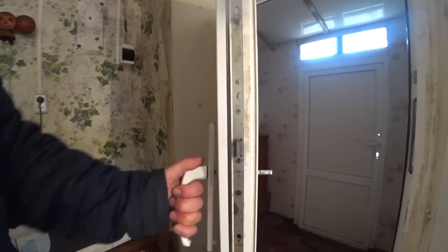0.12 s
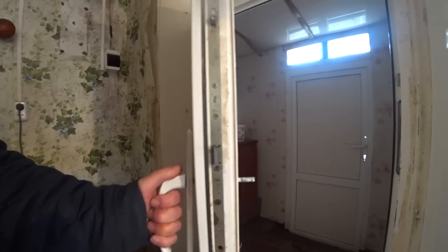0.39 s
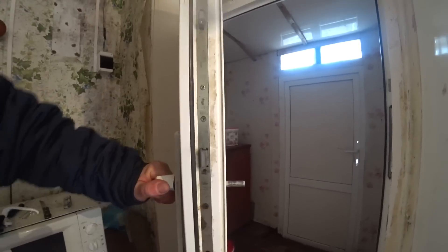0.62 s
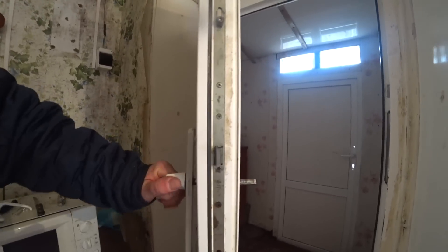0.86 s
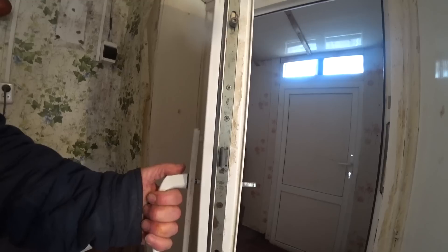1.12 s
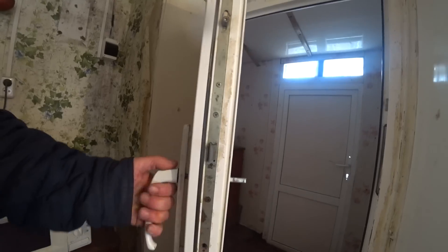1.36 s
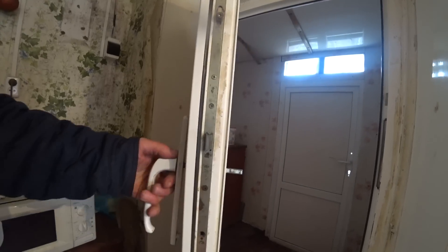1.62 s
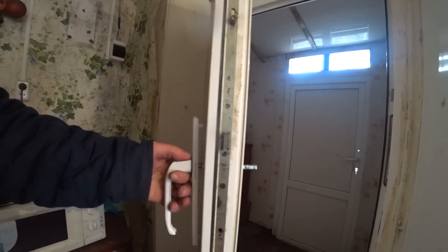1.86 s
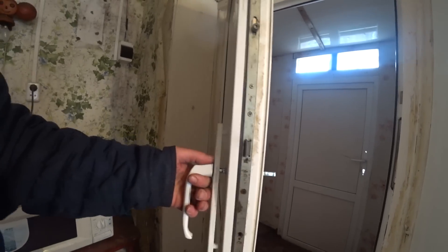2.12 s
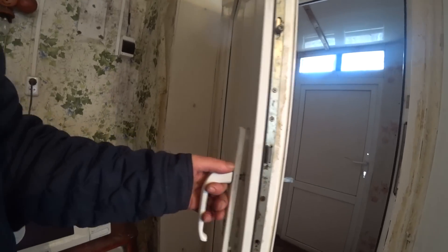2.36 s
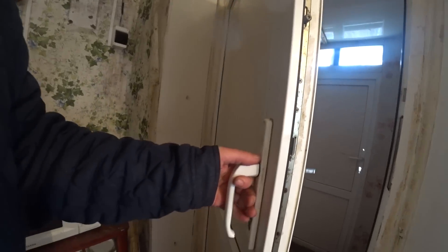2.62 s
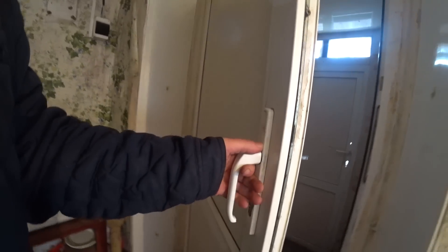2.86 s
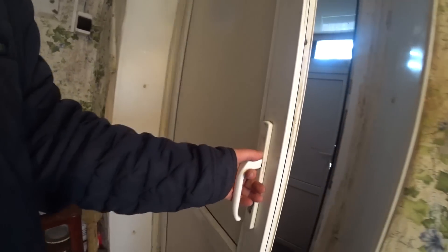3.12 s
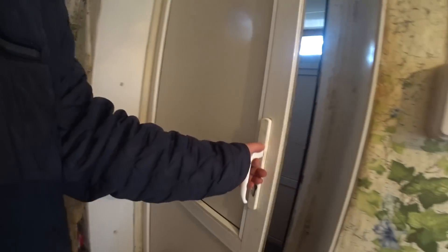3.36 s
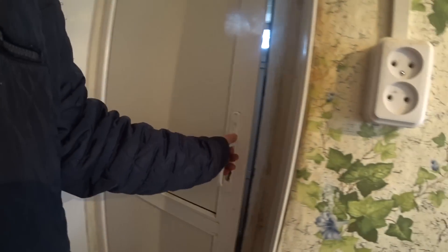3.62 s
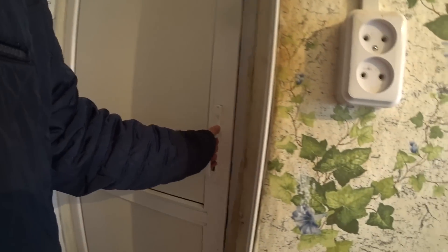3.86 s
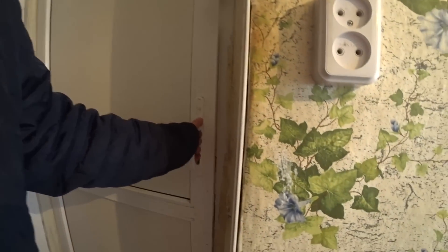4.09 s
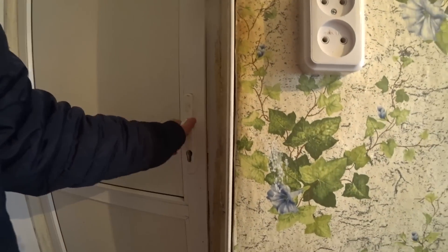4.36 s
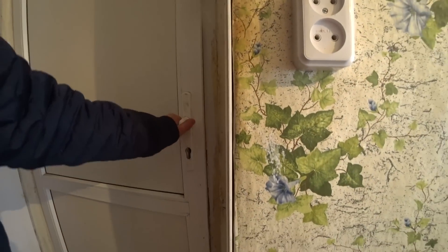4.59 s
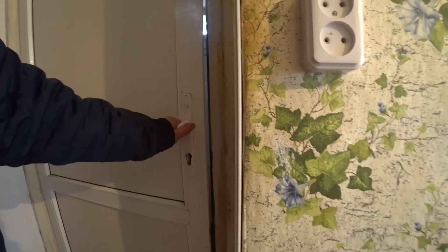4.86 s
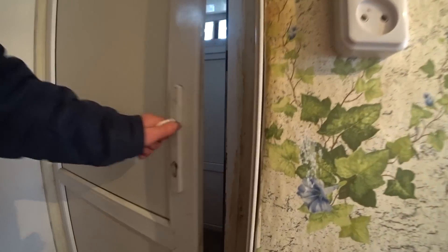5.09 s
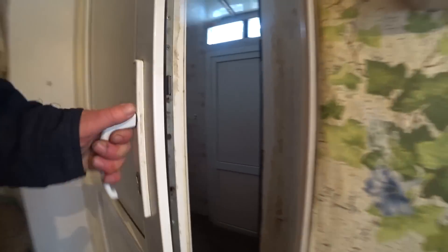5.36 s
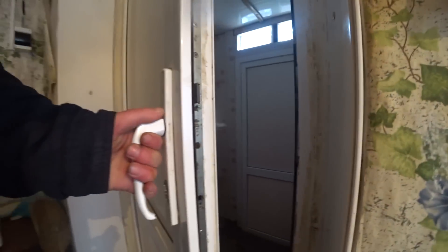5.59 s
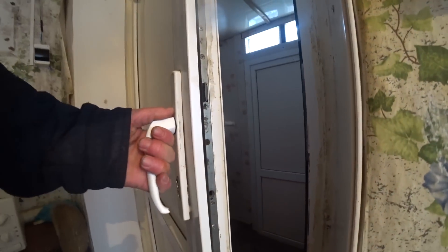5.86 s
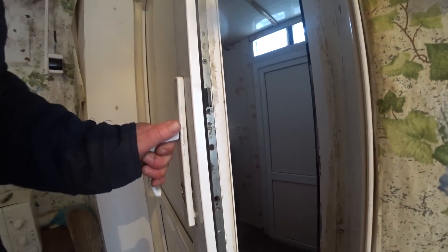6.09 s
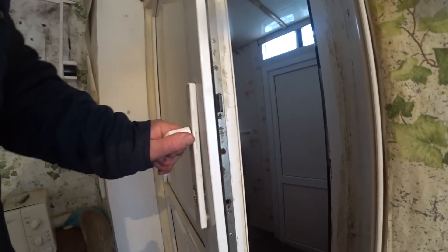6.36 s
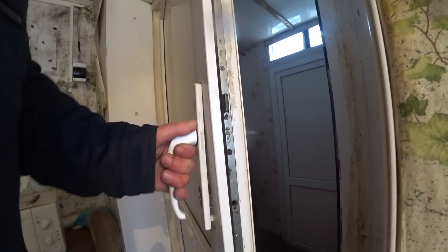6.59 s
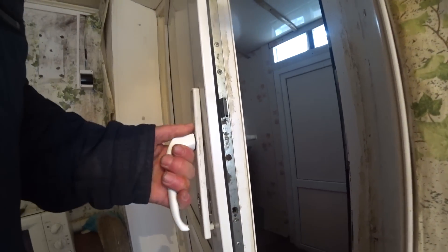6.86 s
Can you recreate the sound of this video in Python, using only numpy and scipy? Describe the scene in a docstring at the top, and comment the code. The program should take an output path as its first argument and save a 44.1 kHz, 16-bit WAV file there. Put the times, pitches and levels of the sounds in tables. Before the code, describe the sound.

In a small bare room, close to the microphone, a hand works the handle of a plastic door. From 0 to 0.25 s a rapid flurry of hard lock clicks peaks near 0.14 s; more clacks come around 0.5-0.65 s and a strong, scraping clatter at 1.0-1.1 s. From 1.3 to 2.8 s clicks become lighter and duller, with small rattles and soft sleeve rustle. Around 2.9-3.9 s the door swings almost quietly, with a few faint ticks and a rising brush. At 3.93 s it shuts with a loud, sharp clack and brief rattling, followed by smaller clicks, one firmer at 4.35 s. After a quiet reopening, clicks return at 5.4 and 5.7 s, a loud snap at 6.1 s, and a double-struck clatter around 6.7 s. Short wall echoes follow each blow; faint steady hiss with thin, wavering high tones continues throughout.

```python
"""The lock of a plastic door clicks and clatters as a hand works its handle: short contacts excite damped modes
of lock case, small steel parts and door leaf. The door is shut and opened again. A small bare room answers each
blow with wall echoes, a dense tail and its lowest modes. Sleeve and door rustle as filtered noise of moving
level and tilt, over a faint steady hiss with thin wavering tones."""
import sys
import numpy as np
from scipy import signal
from scipy.fft import rfft, irfft, next_fast_len
from scipy.io import wavfile
from scipy.ndimage import uniform_filter1d

SR = 44100
rng = np.random.default_rng(int(sys.argv[2]) if len(sys.argv) > 2 else 0)


def wrap_up_sound(samples):
    """Save the sound to the file named by the first command line argument, as 16-bit audio."""
    columns = np.atleast_2d(samples).T
    # keep every value between -1 and 1, then stretch to whole-number steps
    tamed = np.clip(columns, -1, 1)
    steps = np.round(tamed * 32767).astype(np.int16)
    wavfile.write(sys.argv[1], SR, steps)


def volts_from_decibels(level):
    """Turn decibel levels (scalar or array-like) into linear amplitude factors."""
    exponent = np.asarray(level, float) / 20
    return 10 ** exponent


N = 307377  # samples, about 7 s

# Modes of the door leaf, the small steel parts and the lock case:
# (frequency [Hz], relative level [dB], decay time t60 [s])
LEAF_MODES = [(157, -17.5, 0.059), (227.4, -6, 0.064), (282.6, 0, 0.028), (314.4, 9, 0.026),
              (390.4, 3, 0.043), (413.4, 8, 0.031), (518, -45, 0.085), (599, 3.5, 0.047),
              (720, -19.5, 0.004), (949, 16.5, 0.013)]
STEEL_MODES = [(6620, -8, .012), (7190, -8, .012), (8040, -8, .012), (9210, -5, .025), (10400, -9, .012),
               (11400, -7, .03), (13600, -10, .015)]
CASE_MODES = [(750, -18, 0.0038), (1050, -2.5, 0.011), (1300, -0.5, 0.0024), (1650, -0.5, 0.007),
              (1950, 1, 0.0032), (2295, 0.5, 0.0031), (2342, -13.5, 0.0081), (2898, 9, 0.0026),
              (2830, -21.5, 0.002), (3464, 8.5, 0.0021)]
# Clicks of latch, rods and handle stops:
# (time [s], strength [dB], centre of the crack [Hz], knock of the leaf [dB], steel tick [dB])
CLICKS = [(0.0105, -27, 2200, -11.5, -13), (0.0745, -30, 1750, -5, -19), (0.0864, -12.5, 2200, -40, -14),
          (0.096, -11.5, 2250, -28, -17), (0.105, -7.5, 2040, -13.5, -16), (0.1222, -10, 1790, -24, -11),
          (0.1393, 8, 2760, -23.5, -10.5), (0.1621, -0.5, 2250, -14.5, -6.5), (0.182, -6, 2620, -18, -14),
          (0.1957, -9, 2630, -42, -6), (0.213, -2, 2650, -22.5, -8.5), (0.227, -10.5, 3020, -15, -22),
          (0.2436, -21, 1980, -10, -2), (0.3946, -29, 2500, -11, -12), (0.4084, -16.5, 1850, -16, -15.5),
          (0.4552, -12.5, 1050, -32, -8), (0.4615, -6.5, 2300, -40, -13.5), (0.5004, -19, 2500, -23, -14),
          (0.5377, -17, 2110, -9, -15), (0.5905, -2, 2060, -14.5, -14.5), (0.6356, -2.5, 2230, -13, -8),
          (0.6694, -28, 1540, -9, -31), (0.7323, -15, 2000, -30, -26), (0.7625, -24, 1810, -21, -28),
          (0.8157, -35, 1900, -12.5, -22), (0.8852, -22, 2880, -34, -23), (0.918, -18, 1764, -37, -15),
          (0.997, -23, 1650, -11, -8), (1.0085, -8.5, 2500, -39, -11), (1.0591, 4.5, 1860, -40, -6),
          (1.0876, -7.5, 1950, -13, -9), (1.1133, -14.5, 2280, -14, -11), (1.1264, -10, 2920, -16.5, -12),
          (1.299, -32.5, 2450, -32, -9), (1.3203, -18.5, 1800, -14.5, -30), (1.363, -21, 2220, -14, -16),
          (1.3713, -13, 1740, -31, -19), (1.3959, -17.5, 1980, -11.5, -17), (1.408, -15, 1780, -34, -10.5),
          (1.474, -14.5, 1850, -17.5, -25), (1.4956, -19.5, 1940, -40, -35), (1.5355, -13, 1800, -22, -38),
          (1.5875, -23.5, 1760, -6.5, -9), (1.6085, -21, 2710, -21, -15), (1.8105, -23, 1700, -36, -25),
          (1.8219, -16.5, 2120, -6.5, -7), (1.8398, -25, 1300, -2.5, -22), (1.9238, -36.5, 1120, 1, -10),
          (1.953, -19.5, 1880, -10, -11.5), (2.0219, -30.5, 1500, 4, -20), (2.0498, -34.5, 1840, -2, -17),
          (2.0886, -31.5, 1800, -9, -8), (2.2217, -23.5, 1600, 3.5, -18), (2.2364, -23.5, 1650, 3.5, -10),
          (2.2536, -17, 2330, -32, -39), (2.2674, -15, 1790, -33, -6.5), (2.2989, -21.5, 1920, -14, -33),
          (2.3717, -23, 2240, -10.5, -14), (2.4085, -13, 2220, -12.5, -19), (2.5341, -43, 1540, 9, -9),
          (2.6187, -32.5, 1500, 1, -28), (2.7148, -32.5, 1760, -7, -21), (2.738, -31, 950, -19, -26),
          (2.7892, -20.5, 2440, -41, -30), (3.4809, -20, 1370, -50, -11.5), (3.5015, -34, 1320, -32, -17),
          (3.5458, -32, 1480, -15, -27), (3.943, 4.5, 2360, -15.5, -16), (3.9836, -6.5, 2160, -15.5, -16),
          (3.9975, -6.5, 1840, -17, -8.5), (4.0744, -13.5, 2590, -31, -17), (4.1011, -17, 1720, -34, -15),
          (4.1238, -22, 1880, -16, -18), (4.1509, -29, 1680, -11, -23), (4.211, -24, 3120, -15, -5.5),
          (4.234, -24.5, 1440, -10, -24), (4.35, -6.5, 2250, -13.5, -33), (4.3827, -31, 1200, -5.5, -31),
          (4.4926, -40, 1570, 0, -21), (4.5621, -34, 1500, -23, -44), (4.617, -31.5, 1640, -4.5, -16),
          (4.702, -36.5, 1410, -1, -22), (4.7312, -32.5, 1850, -14, -19), (4.7545, -24.5, 1380, -5, -27),
          (5.107, -35.5, 1770, -12.5, -17), (5.4116, -16, 2860, -48, -14), (5.432, -8.5, 2500, -14, -20),
          (5.6842, -26, 1300, -6, -18), (5.7036, -13, 2350, -9.5, -14), (5.7901, -29, 1880, -9, -16),
          (5.8364, -28, 2140, -11, -20), (5.9823, -33, 2130, -7, -26), (6.0429, -13.5, 2440, -28, -7),
          (6.064, -17.5, 2250, -39, -1.5), (6.071, -6, 2210, -32, -42), (6.1158, 3.5, 2500, -25, -13),
          (6.1497, -22, 2050, -5, -10), (6.224, -26, 1930, -10.5, -30), (6.3411, -26, 1530, -42, -24),
          (6.376, -29, 2040, -35, -12), (6.516, -19.5, 1680, -18, -14.5), (6.6301, -17.5, 1920, -21, -13),
          (6.6626, -5.5, 2200, -58, -21), (6.724, -1, 2600, -15, -15), (6.7269, 2.5, 2590, -43, -12),
          (6.7946, -18.5, 2270, -29, -9)]
# Parts dragged over one another, a chatter that lasts:
# (time [s], strength [dB], knock of the leaf [dB], steel tick [dB], chatter, at most 30 used [ms per 8 dB fall])
SCRAPES = [(0.0368, -31, -7, -15, 15), (0.4464, -15, -5, -17, 23), (1.0125, -9, -10, -10.5, 39),
           (1.0158, -8, -36, -14, 30), (1.4014, -22.5, -18, -26, 24), (1.326, -32, -26, -30, 33),
           (1.481, -24.5, -25, -32, 33), (1.5553, -25.5, -39, -26, 23), (2.5857, -30, -12, -9, 21),
           (2.7691, -35, -5, -1, 7.8), (2.7824, -20.5, -39, 0, 24.6), (3.43, -36.5, -26, -2, 32),
           (3.9286, 3.5, -51, -11.5, 9.3), (4.0122, -10, -9.5, -16.5, 21.7), (4.2475, -28, -13, -18, 39),
           (4.34, -15.5, -28, -9, 8.2), (4.631, -47, 10, -30, 22), (4.7489, -24.5, -41, -11.5, 9.4),
           (5.442, -24, -8, -32, 41), (5.5321, -17.5, -13, -10, 14.4), (5.6976, -14.5, -19, -12.5, 12.3),
           (6.04, -11.5, -30, -19, 6.2), (6.08, -11, -10.5, -12, 25), (6.6541, -25, -4.5, -14, 21),
           (6.7188, -15, -19, -4.5, 53), (6.7598, -24.5, 2, 4, 5.6)]
# Spans in which the hand only holds while the door swings: (start [s], end [s])
SWINGS = [(2.9, 3.92), (4.85, 5.4)]
# Decay of the room tail: (frequency [Hz], decay time t60 [s])
ROOM_DECAY = [(100, 0.58), (260, 0.34), (700, 0.19), (1840, 0.32), (4850, 0.16), (12800, 0.099)]
# Spectrum of the room tail: (frequency [Hz], level [dB])
ROOM_COLOUR = [(60, -31), (250, -5), (700, 1.5), (1500, -7), (3000, -9.5), (6000, 0), (15000, -4.5)]
# Reflections from the nearest walls: (delay [ms], level [dB])
ECHOES = [(2.4, -14.5), (6.1, -16.5), (9.5, -44), (12.5, -16.5), (21.5, -28.5)]
# Lowest modes of the room: (frequency [Hz], level [dB], decay time t60 [s])
ROOM_MODES = [(75, -65, 0.59), (103.5, -68.5, 0.75), (109, -112, 0.36)]
# Likeness of left and right in room tail and rustle, then in hiss: (frequency [Hz], likeness [-1 to 1])
ROOM_ALIKE = [(60, 1), (180, 0.97), (550, 0.94), (1650, 1), (4970, 0.52), (15000, 0.61)]
HISS_ALIKE = [(60, 0.95), (180, 0.38), (550, 0.019), (1650, 0.051), (4970, 0.059), (15000, 0.18)]
# Sliding rods, sleeve and swinging door: (time [s], level [dB], brightness [dB per octave])
RUSTLE = [(0.0, -40.5, -3), (0.36, -56.5, -4), (0.6, -40, -4), (0.84, -56.5, -2), (1.3, -50.5, -1.5),
          (1.49, -43, -4), (1.7, -49, -3.5), (1.93, -39.5, -5), (2.17, -66, 3), (2.41, -43.5, -3.5),
          (2.85, -49.5, -1.5), (3.0, -57.5, 1.2), (3.37, -51.5, -4), (3.62, -46, -0.5), (3.78, -38.5, 0.3),
          (3.9, -64, -2), (4.2, -43.5, -6), (4.5, -58, -9), (5.2, -55, -2.5), (5.5, -49.5, -3.5),
          (5.93, -58, -4.5), (6.22, -48.5, -5.5), (6.46, -58, -2), (6.68, -49.5, -2.5), (6.97, -66, -12)]
# Spectra of rustle and hiss: (frequency [Hz], relative density [dB per Hz])
RUSTLE_COLOUR = [(35, -51), (60, -34), (156, -8.5), (323, -25), (427, -2.5), (553, -0.5), (636, -8),
                 (2140, 3), (7230, -9.5), (16000, -21)]
HISS_COLOUR = [(18, -49), (30, -62), (112, -33), (328, -8), (473, -16), (526, -3), (1960, -4.5), (2480, -5),
               (3060, -6), (4530, -16), (8520, -23), (9710, -21.5), (16000, -24)]
# Thin tones of the electronics: (frequency [Hz], rms level [dB])
WHINE = [(2422, -61.5), (2934, -69), (6352, -94), (7257, -99), (9889, -72), (9948, -83), (12349, -73),
         (12409, -88)]
# Level of the left microphone port over the right: (frequency [Hz], level [dB])
PORT_LEVEL = [(60, 0.5), (150, 0.5), (380, 1.5), (950, 1), (2380, -2.5), (5980, -2.5), (15000, 2.5)]
# Phase by which the left port leads the right: (frequency [Hz], lead [rad])
PORT_LEAD = [(60, 0.41), (1000, -0.4), (2700, -0.28), (4600, 0.14), (6500, 0.43), (8000, -0.14),
             (16000, -0.24)]


def evened(x):
    """Normalization: a signal is scaled to unit rms."""
    return x / np.sqrt(np.mean(x ** 2) + 1e-20)


def read(points, hz):
    """Interpolation of a spectrum along a logarithmic frequency axis."""
    f, value = np.transpose(points)
    return np.interp(np.log(hz + 1), np.log(f + 1), value)


def add(mix, s, sound):
    """Superposition: a sound is added to the mix from time s."""
    part = mix[round(s * SR):][:len(sound)]
    part += sound[:len(part)]


def noise(gain, alike):
    """Partial coherence: a shared and a private noise, weighted by bins x frames gains, form two channels."""
    size = 2 * len(gain) - 2
    hz = np.fft.rfftfreq(size, 1 / SR)
    a, b, c, d = rng.standard_normal((gain.shape[1], len(gain), 4)).T
    shared, private = a + 1j * b, c + 1j * d
    same = np.clip(read(alike, hz), -1, 1)[:, None]
    right = same * shared + np.sqrt(1 - same ** 2) * private
    z = gain * np.array([shared, right])
    return signal.istft(z, nperseg=size, noverlap=3 * (len(gain) - 1) // 2)[1]


def rustle():
    """Friction noise: cloth or metal rubs in patches, its spectrum tilting as it slides."""
    s, level_db, tilt_db = np.transpose(RUSTLE)
    hz = np.fft.rfftfreq(512, 1 / SR)[:, None]
    t = np.arange(N // 128 + 5) * 128 / SR
    patches = uniform_filter1d(rng.standard_normal((len(t), 257)), 5, 0)  # smooth in time,
    patches = evened(uniform_filter1d(patches, 30, 1)).T  # then in frequency
    tilt = np.interp(t, s, tilt_db) * np.log2((hz + 50) / 1800)
    colour = volts_from_decibels(read(RUSTLE_COLOUR, hz) + tilt + 0.83 * patches)
    colour = colour / np.sqrt(uniform_filter1d((colour ** 2).mean(0), 40))  # tilt leaves the level alone
    level = volts_from_decibels(np.interp(np.arange(N) / SR, s, level_db))
    return evened(noise(colour, ROOM_ALIKE)[:, :N]) * level


def hiss():
    """Stationary noise of room and microphone, joined by thin phase-modulated tones."""
    hz = np.fft.rfftfreq(2048, 1 / SR)[:, None]
    port_hz, port_width_hz, port_db = 6700, 1000, 7.2  # resonance of the microphone port
    port = port_db * np.exp(-((hz - port_hz) / port_width_hz) ** 2)
    colour = volts_from_decibels(read(HISS_COLOUR, hz) + port) * np.ones(N // 512 + 5)
    bed = evened(noise(colour, HISS_ALIKE)[:, :N])
    t = np.arange(N) / SR
    waver = evened(uniform_filter1d(rng.standard_normal(N), 3000))
    tones = sum(volts_from_decibels(db) * np.sqrt(2) * np.sin(2 * np.pi * f * t + 2.2 * waver) for f, db in WHINE)
    return volts_from_decibels(-49) * bed + tones


def ring(modes, reach_db, size, cycles=0.23):
    """Modal synthesis: each mode swells over its first cycles, then decays, as strongly as the blow reaches it."""
    hz, db, t60 = np.transpose(modes)[:, :, None]
    t = np.arange(size) / SR
    swell = 1 - np.exp(-(t * hz / cycles) ** 2)
    phase = np.pi * np.arange(len(hz))[:, None]  # neighbouring modes start in opposite directions
    decay = volts_from_decibels(db + reach_db[:, None] - 60 * t / t60)
    return (decay * swell * np.sin(2 * np.pi * hz * t + phase)).sum(0)


def blow(s, db, hz, knock_db, tick_db, chatter_ms, chance, grit):
    """Impact excitation: one contact and its quick rebounds ring lock case, small steel parts and leaf."""
    t = np.arange(len(grit)) / SR
    contacts = grit / 4.06 * (abs(grit) > 1.9)  # loose parts rebound a few times a millisecond
    contacts[0] = 1
    contacts = contacts * volts_from_decibels(-8 * t * 1000 / np.clip(chatter_ms, .3, 30))

    def struck(modes, reach_db, cycles):
        """Convolution of the contacts with a modal response, scaled by its strongest short-time power."""
        sound = signal.fftconvolve(contacts, ring(modes, reach_db, len(t), cycles))[:len(t)]
        return sound / np.sqrt(uniform_filter1d(sound ** 2, size=60).max() * 2)

    reach_db = 1.8 * chance  # the point struck favours some modes
    octaves = np.log2(np.transpose(CASE_MODES)[0] / hz)
    crack = struck(CASE_MODES, reach_db[:10] - 9 * octaves ** 2, cycles=0.79)
    dulling = signal.butter(3, 3500, fs=SR, output="sos")  # the microphone dulls the crack above about 3.5 kHz
    crack = signal.sosfilt(dulling, crack)

    tick_band = signal.butter(2, [3600, 9500], "bandpass", fs=SR, output="sos")
    tick = signal.sosfilt(tick_band, contacts)
    tick = tick / abs(tick).max() + volts_from_decibels(-23.5) * struck(STEEL_MODES, reach_db[10:17], cycles=0.64)

    heavy = np.clip((knock_db + 12.5) / 14, 0, 1.5)  # blows that shake the leaf most reach its lowest modes
    shut_s, opened_s = 3.9, 4.9  # the door rests in its frame
    heavy = heavy + 0.94 * (shut_s < s < opened_s)  # the frame of the shut door favours low modes too
    octaves = np.log2(np.transpose(LEAF_MODES)[0] / 300)
    knock = struck(LEAF_MODES, reach_db[17:] - 7 * heavy * octaves, cycles=1.02)
    return volts_from_decibels(db) * (crack + volts_from_decibels(knock_db) * knock + volts_from_decibels(tick_db) * tick)


def loose_parts():
    """Secondary impacts: loose parts settle after each click and tick at chance while the hand moves."""
    when, size = rng.random((len(CLICKS), 2)).T
    late = 0.006 + 0.039 * when  # s after the click
    change_db = -13 - 250 * late + 4 * (2 * size - 1)  # later is weaker, with a spread of +-4 dB
    after = [(s + wait, db + change, *colour, 11.5)  # chatter, ms per 8 dB fall
             for (s, db, *colour), wait, change in zip(CLICKS, late, change_db)]

    fidgets = 44
    when, size = rng.random((fidgets, 2)).T
    when = (np.arange(fidgets) + when) / fidgets * N / SR
    rustle_db = np.interp(when, *np.transpose(RUSTLE)[:2])
    level_db = rustle_db + 6 + 6 * (2 * size - 1)  # follows the rustle, 0 to 12 dB higher in strength
    loose = (1700, -9.5, -16, 4.5)  # crack [Hz], knock [dB], tick [dB], chatter [ms per 8 dB fall]
    ticks = [(s, db, *loose) for s, db in zip(when, level_db)
             if not any(a < s < b for a, b in SWINGS)]
    return after + ticks


def room_tail():
    """Reverberation: a few wall reflections and a dense tail, each band decaying at its own rate."""
    hz = np.fft.rfftfreq(128, 1 / SR)[:, None]
    t = np.arange(700) * 32 / SR
    tail = noise(volts_from_decibels(-60 * t / read(ROOM_DECAY, hz)), ROOM_ALIKE)
    size = tail.shape[1]
    tail = tail * np.minimum(np.arange(size) / (0.0011 * SR), 1)  # 1.1 ms rise
    colour = volts_from_decibels(read(ROOM_COLOUR, np.fft.rfftfreq(size, 1 / SR)))
    tail = irfft(rfft(tail / np.linalg.norm(tail[0])) * colour, size)
    for ms, db in ECHOES:
        tail[:, round(ms * SR / 1000)] += volts_from_decibels(db) * rng.choice([-1, 1])
    return tail


def lock():
    """Linear superposition of all blows, direct and convolved with the room over six echo paths."""
    clicks = [(*row, 3.48) for row in CLICKS]  # chatter, ms per 8 dB fall
    scrapes = [(s, db, 2200, *rest) for s, db, *rest in SCRAPES]  # centre of the crack, Hz
    blows = clicks + scrapes + loose_parts()
    paths = np.zeros((6, N))
    chance = rng.standard_normal((len(blows), 27))  # one per mode
    grit = rng.standard_normal((len(blows), 4500))
    for k, row in enumerate(blows):
        add(paths[k % 6], row[0], blow(*row, chance[k], grit[k]))  # neighbours take different paths
    room_modes = ring(ROOM_MODES, np.zeros(len(ROOM_MODES)), size=SR // 2)
    boom = signal.oaconvolve(paths.sum(0), room_modes)[:N]
    no_bass = signal.butter(4, 185, "highpass", fs=SR, output="sos")  # a door radiates no deep bass
    paths = signal.sosfilt(no_bass, paths)
    echoed = sum(signal.oaconvolve(p[None], room_tail(), axes=1)[:, :N] for p in paths)
    return boom + paths.sum(0) + echoed


def scene():
    """Superposition of lock and door, rustle and hiss."""
    return lock() + rustle() + hiss()


def roll_off(x):
    """The treble ends steeply here."""
    return signal.sosfilt(signal.butter(12, 16310, fs=SR, output="sos"), x)


def record(dry):
    """Stereo reception: two microphone ports differ in level and phase, and peaks beyond full scale clip."""
    size = next_fast_len(N)
    hz = np.fft.rfftfreq(size, 1 / SR)
    # each port takes half of the difference
    half = volts_from_decibels(read(PORT_LEVEL, hz) / 2) * np.exp(.5j * read(PORT_LEAD, hz))
    ports = irfft(rfft(dry, size) * np.array([half, 1 / half]), size)[:, :N]
    return roll_off(np.clip(ports, -1, 1))


dry = scene()
out = record(dry)
wrap_up_sound(out)
```